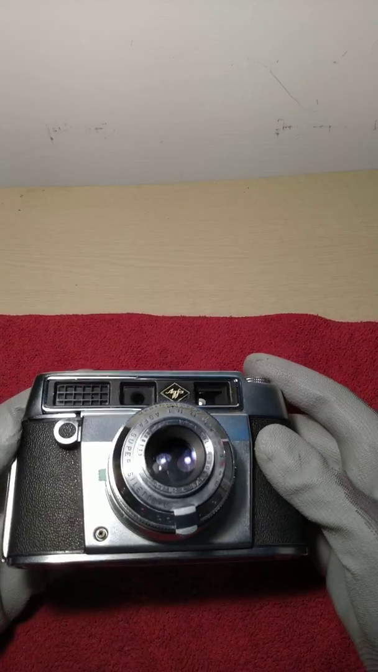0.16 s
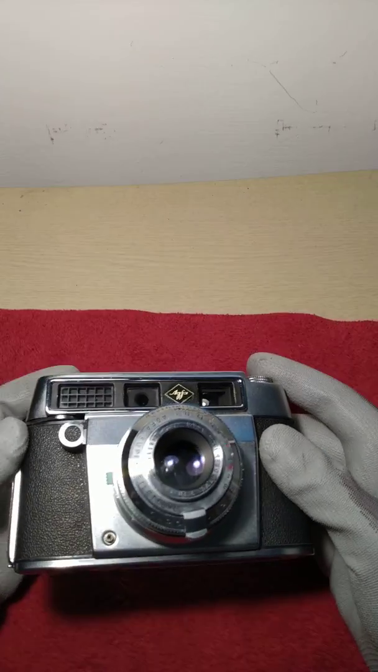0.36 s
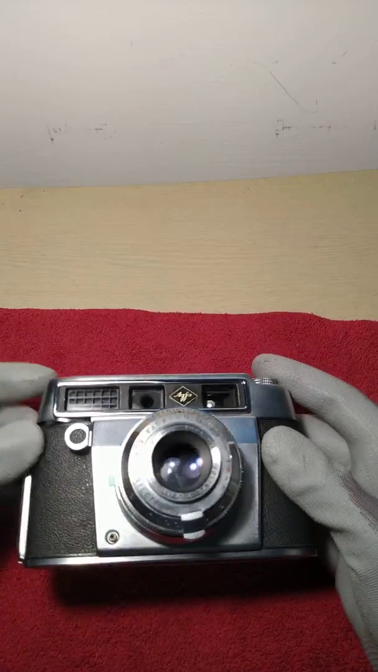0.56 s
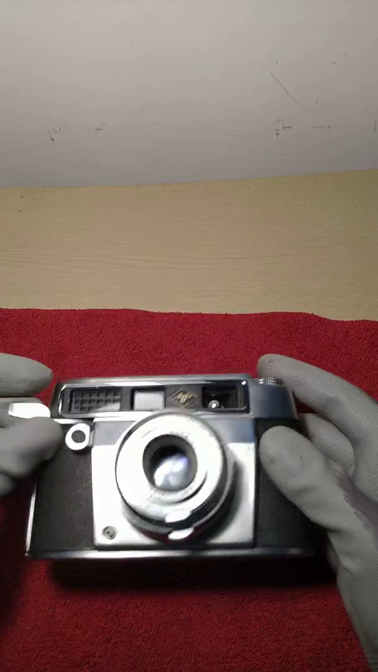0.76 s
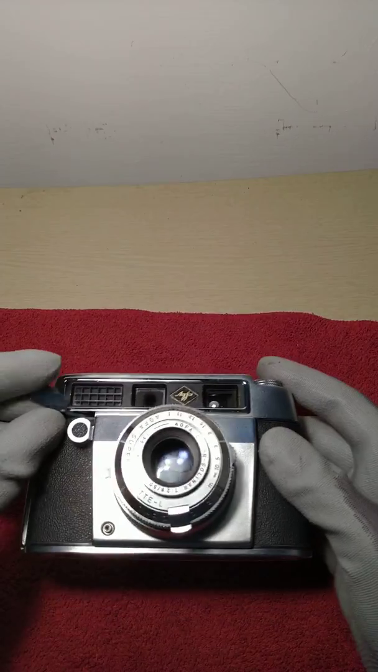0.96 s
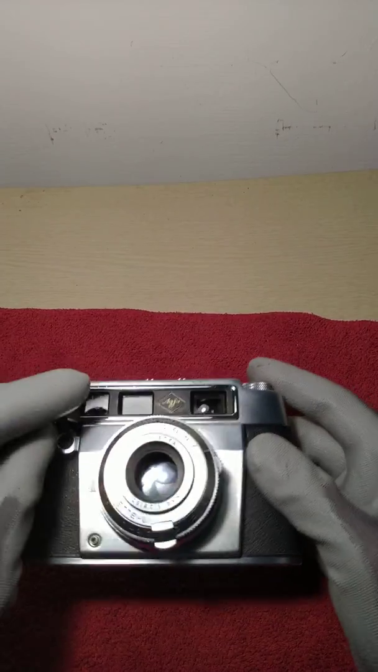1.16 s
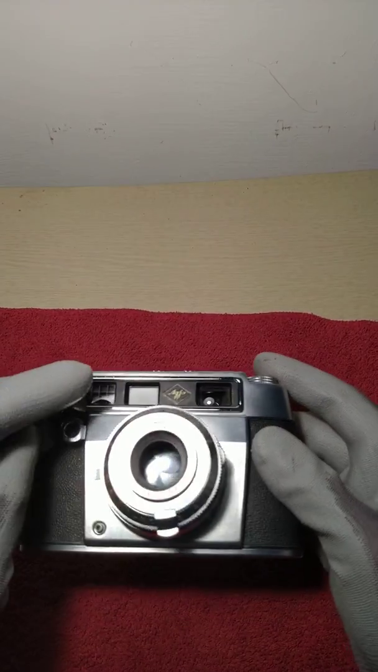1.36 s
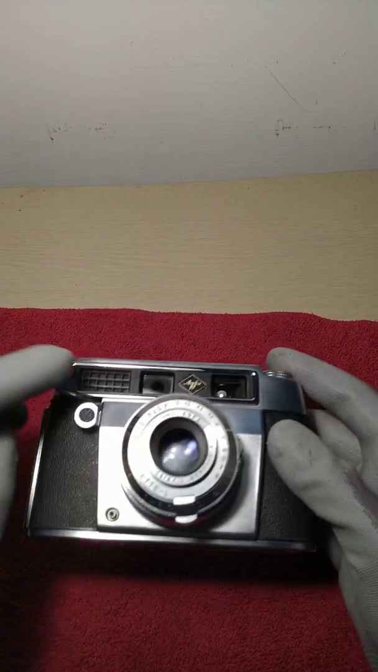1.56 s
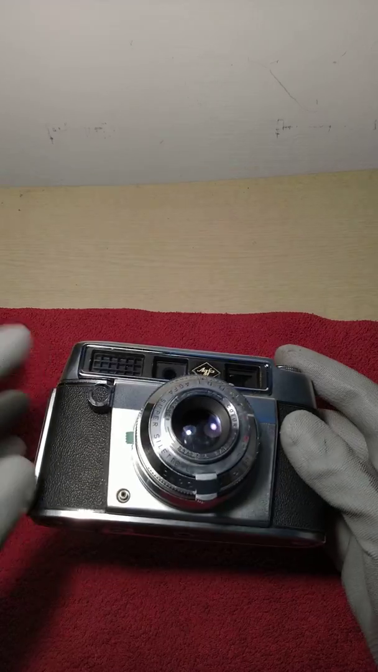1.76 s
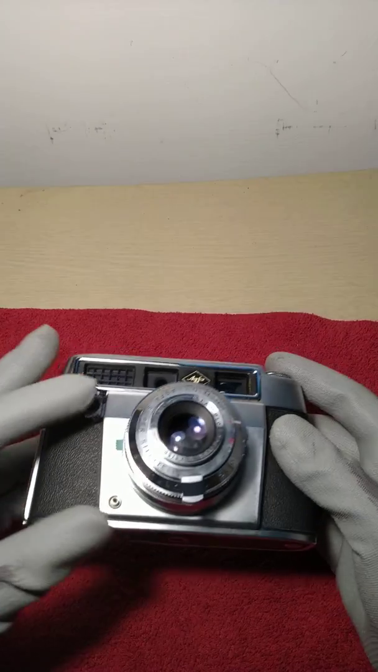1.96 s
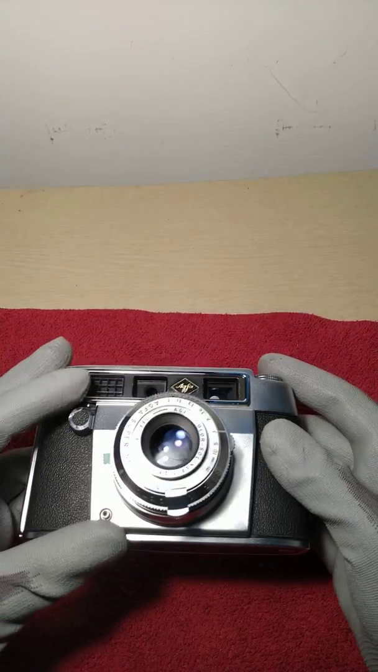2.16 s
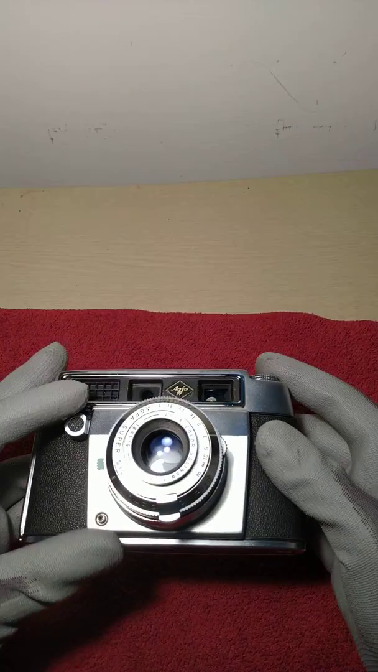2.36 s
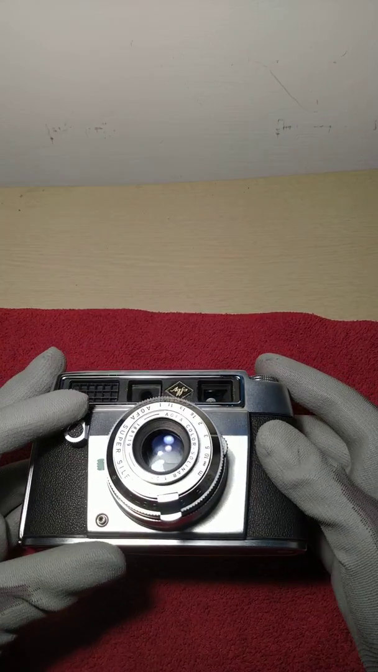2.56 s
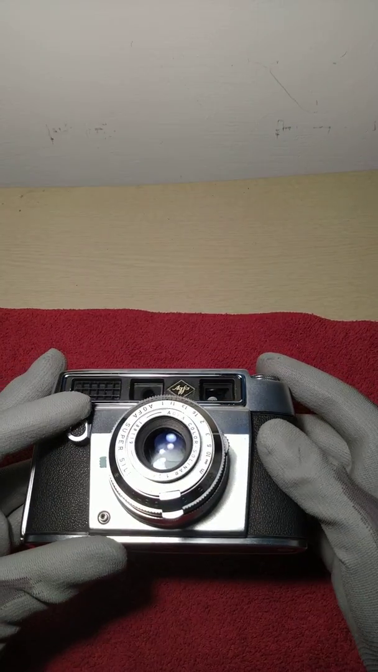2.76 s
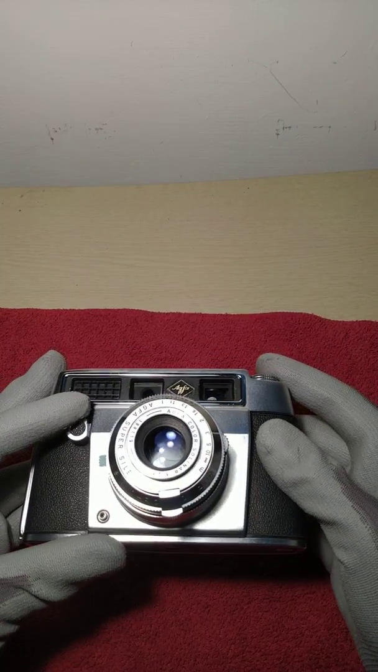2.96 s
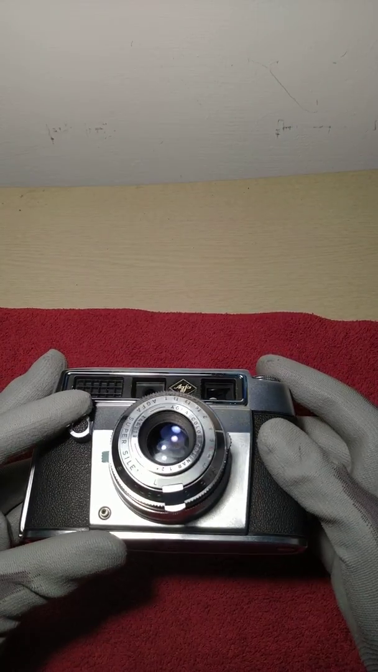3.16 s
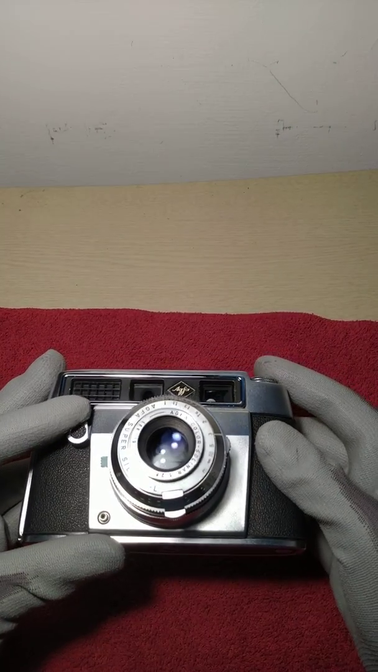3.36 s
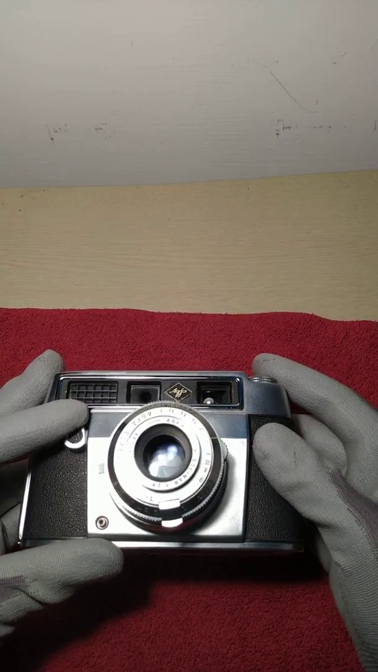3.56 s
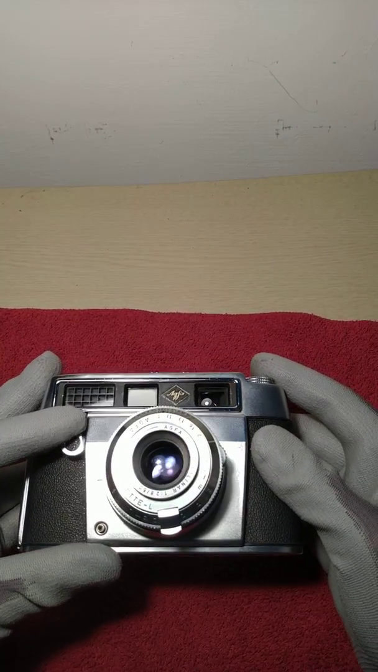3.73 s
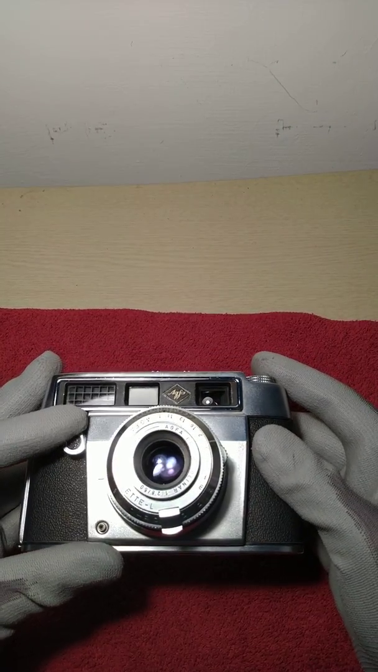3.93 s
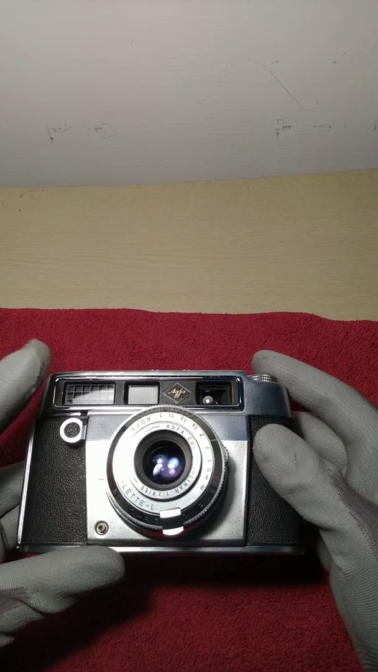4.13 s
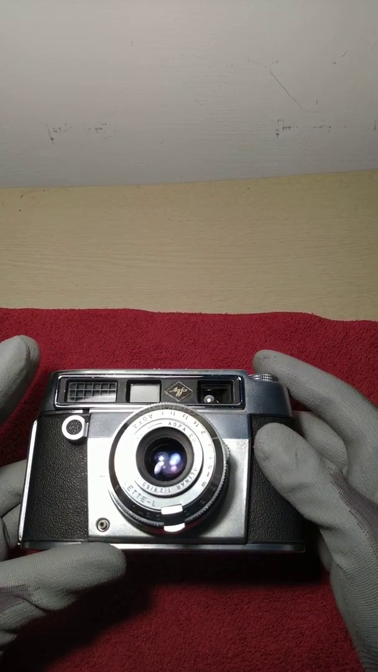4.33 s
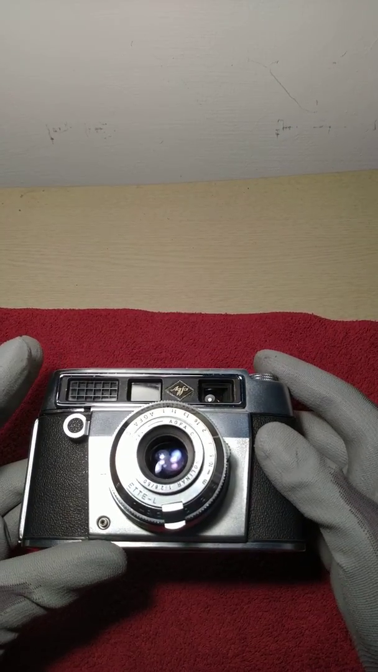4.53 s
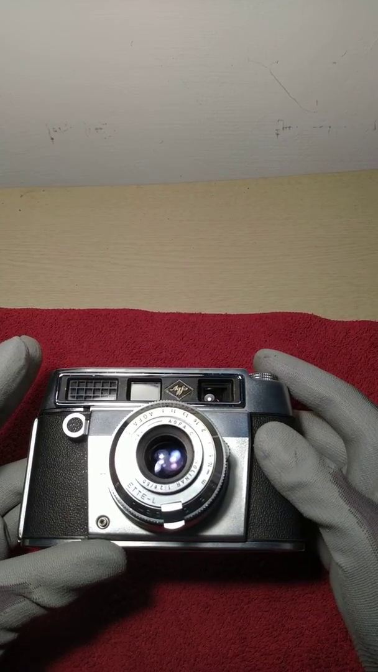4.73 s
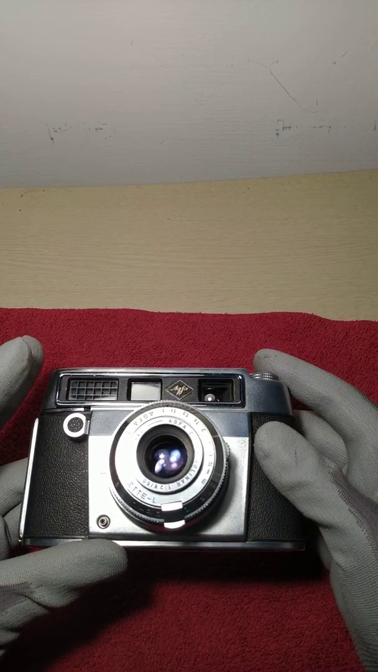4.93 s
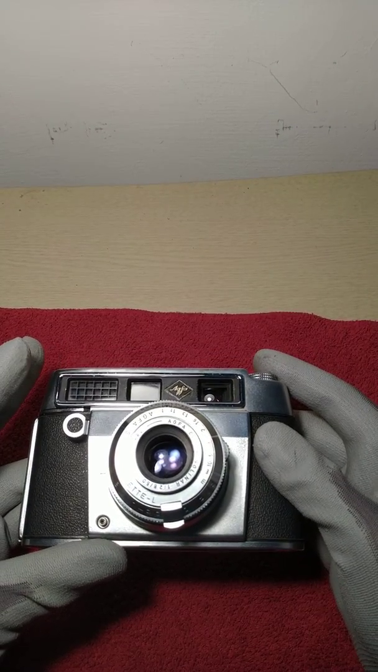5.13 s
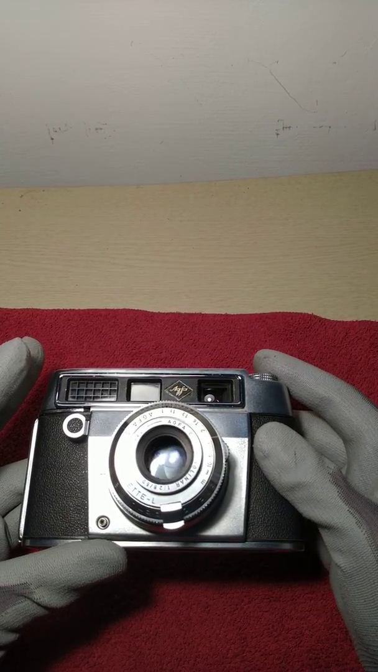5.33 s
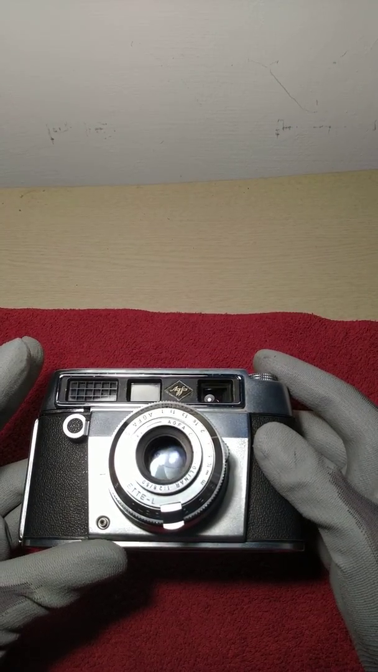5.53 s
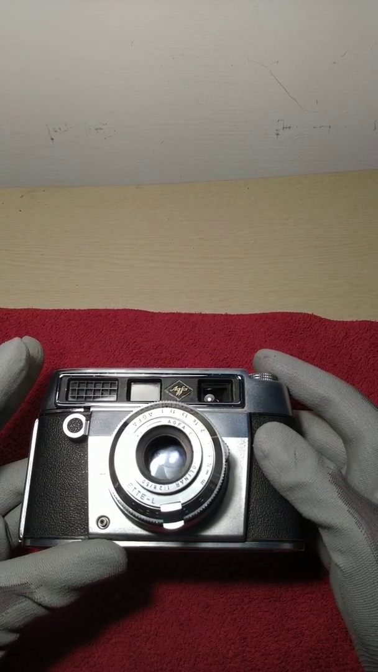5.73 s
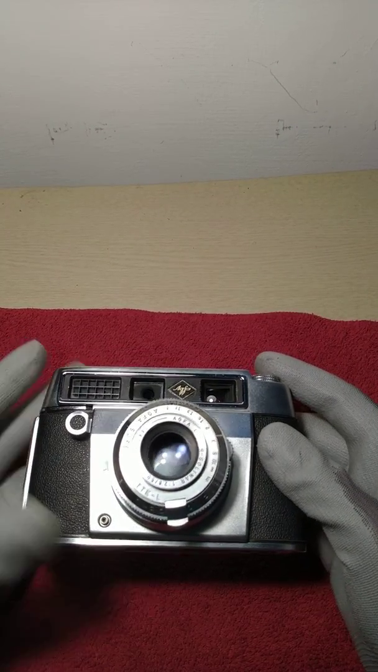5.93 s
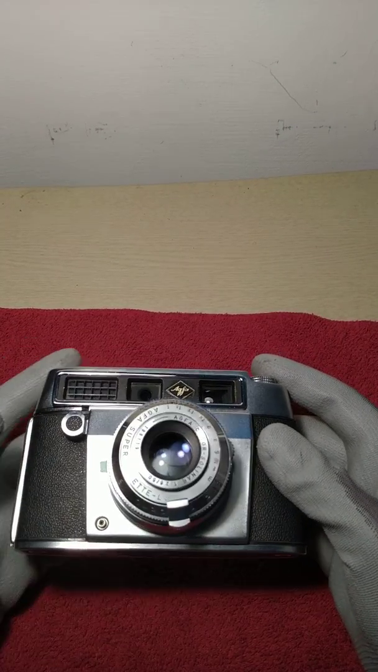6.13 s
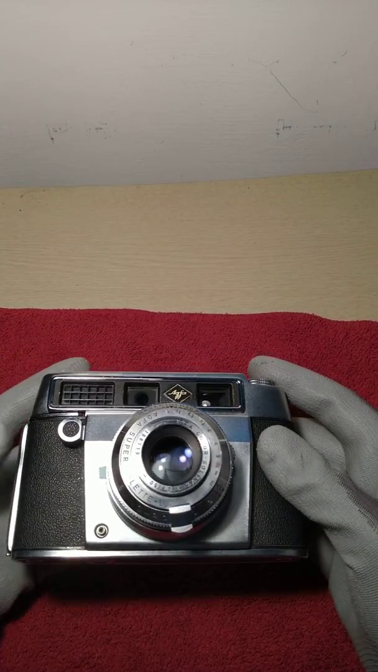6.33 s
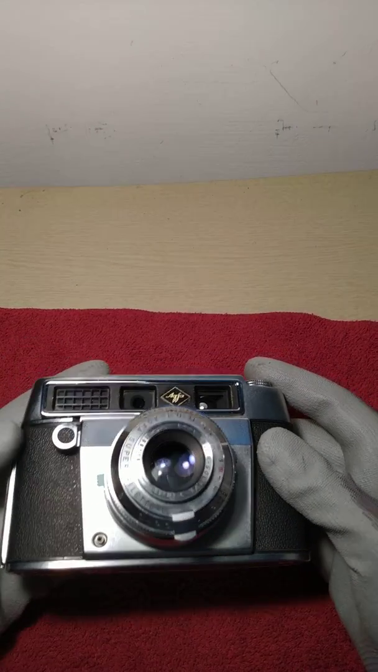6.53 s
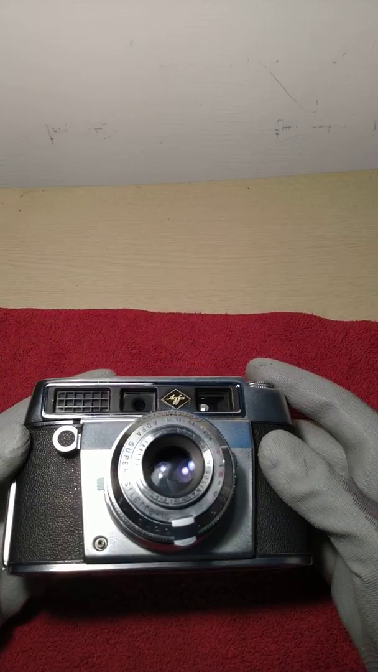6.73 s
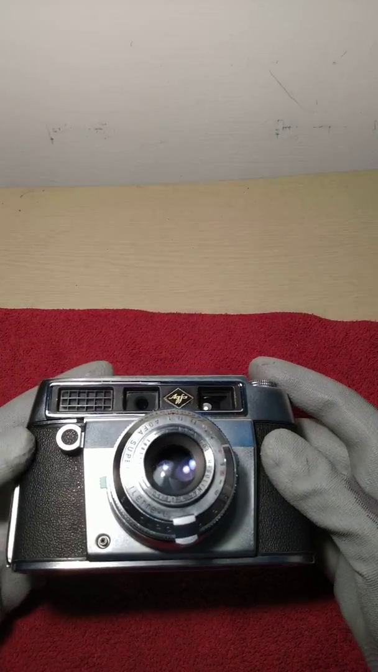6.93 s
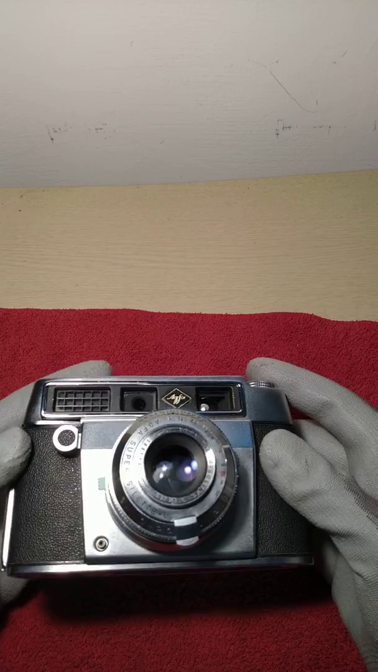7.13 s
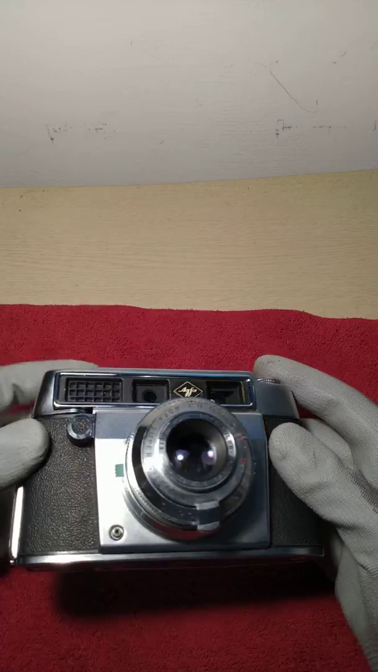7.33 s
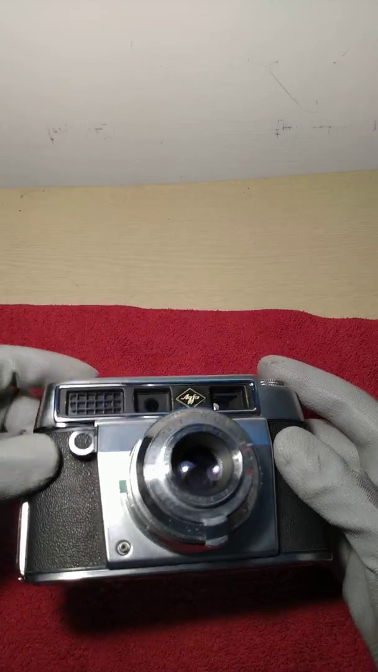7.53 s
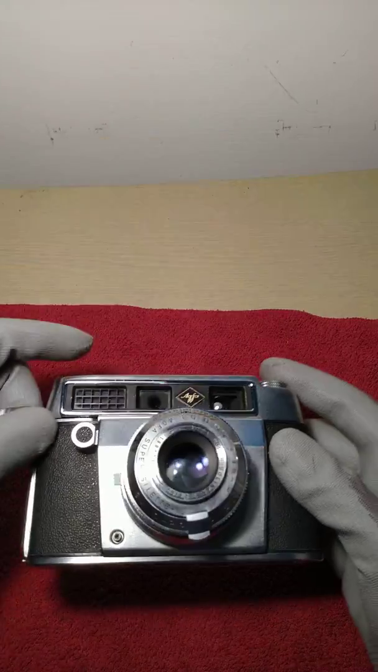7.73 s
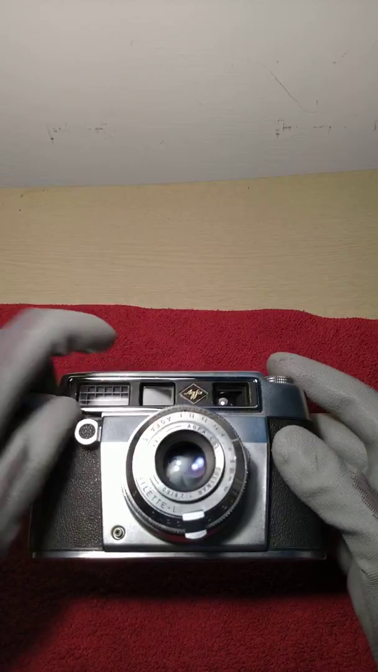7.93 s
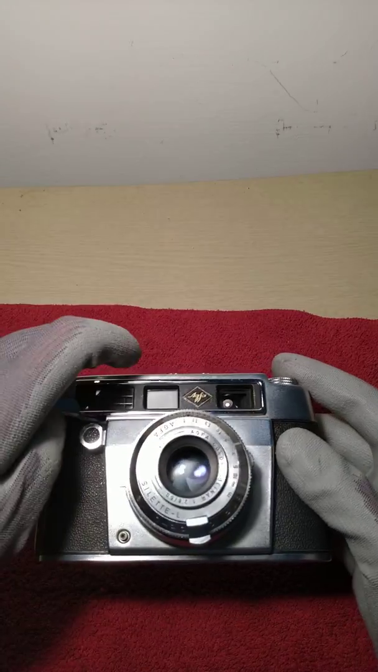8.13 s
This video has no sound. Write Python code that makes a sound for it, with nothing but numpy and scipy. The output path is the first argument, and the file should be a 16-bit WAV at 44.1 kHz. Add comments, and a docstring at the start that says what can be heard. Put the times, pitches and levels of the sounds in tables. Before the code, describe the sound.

Gloved hands ratchet and snap a vintage camera's lever, trip its shutter into a buzzing clockwork whirr, then wind again over low room hum.

```python
"""A small quiet room, two microphones 16 cm apart, an old leaf-shutter camera on a cloth-covered table.
Throughout, mains hum and ventilation: slowly swelling sines and shaped noise. First gloved hands wind: a
pawl clicks over a ratchet, gears drag, and the lever snaps home with a thump of the table. Then the release
trips the shutter, its clockwork escapement whirrs through a long exposure and stops; the winding resumes.
Each contact is a burst of tiny taps that rings the modes of the body and its small steel parts."""
import sys
import numpy as np
from scipy import signal
from scipy.fft import rfft, irfft, next_fast_len
from scipy.io import wavfile

SR = 44100
rng = np.random.default_rng(int(sys.argv[2]) if len(sys.argv) > 2 else 0)


def log_audio(samples):
    """Write samples as a 16-bit WAV file to the path given in sys.argv[1]."""
    # one column per channel
    frames = np.atleast_2d(samples).T
    # limit to full scale, then quantise
    limited = np.clip(frames, -1, 1)
    pcm = np.round(limited * 32767).astype(np.int16)
    wavfile.write(sys.argv[1], SR, pcm)


def boost(x):
    """Linear amplitude factor 10**(x/20) for a level x in decibels (scalar or array-like)."""
    u = np.asarray(x, float) / 20
    return 10 ** u


N = 365588
PADDED = next_fast_len(N)
SECONDS = np.arange(N) / SR


def rms_one(x):
    """Scales to rms 1."""
    return x / np.sqrt(np.mean(x ** 2) + 1e-20)


def energy_one(x):
    """Scales each channel to energy 1."""
    return x / np.sqrt(np.sum(x ** 2, -1, keepdims=True))


def in_time(rows):
    """Reads each column of a curve at every sample; the first column is the time."""
    s, *columns = np.transpose(rows)
    return [np.interp(SECONDS, s, column) for column in columns]


def while_on(rows, fade_s=0.0065):
    """Is 1 between the first and last row, with short fades outside."""
    start, end = rows[0][0], rows[-1][0]
    return np.interp(SECONDS, [start - fade_s, start, end, end + fade_s], [0, 1, 1, 0])


def at_hz(points, hz):
    """Reads a spectrum on a log-frequency axis."""
    point_hz, db = np.transpose(points)
    return np.interp(np.log(hz), np.log(point_hz), db)


def drift(rate_hz):
    """Wanders by chance: normal values, rate_hz of them a second, joined by straight lines."""
    return np.interp(SECONDS * rate_hz, np.arange(1000), rng.standard_normal(1000))


# How much louder ventilation and hiss are on the left. Each row: frequency in Hz, left over right in dB.
LEFT_OVER_RIGHT = [(60, 2.5), (110, -2), (200, 5), (380, 2.5), (700, 1), (1290, -1.5), (2380, -1),
                   (4400, -2.5), (8120, -0.5), (15000, 2.5)]


def diffuse(spectrum):
    """Noise arriving from all sides: two spaced microphones agree only at long wavelengths."""
    gap_m, sound_m_per_s = 0.16, 343
    hz = np.maximum(np.fft.rfftfreq(PADDED, 1 / SR), 1)
    mid, side = rfft(rng.standard_normal((2, PADDED)))
    alike = np.sinc(2 * hz * gap_m / sound_m_per_s)
    inside = (hz > spectrum[0][0]) & (hz < spectrum[-1][0])
    gain = inside * boost(at_hz(spectrum, hz) + at_hz(LEFT_OVER_RIGHT, hz) * [[0.5], [-0.5]])
    gain /= np.sqrt(2 * np.mean((gain * (hz > 150)) ** 2))     # rms 1 counted above 150 Hz
    pair = np.sqrt(1 + alike) * mid + np.sqrt(np.abs(1 - alike)) * side * [[1], [-1]]
    return hz, gain * pair


# Ventilation in the room. Each row: frequency in Hz, relative density in dB per Hz.
VENTILATION = [(15, -45), (25, -3), (54, -9), (119, -3), (216, -12), (285, -3.5), (344, -8.5), (401, 0.5),
               (468, -6.5), (519, -11), (756, -10.5), (852, -6), (961, -12.5), (1100, -7.5), (1500, -16.5),
               (1950, -32), (3300, -120)]
# Swell of the ventilation's drone. Each row: time in seconds, level in dB.
DRONE_SWELL = [(0, -2.5), (1.5, -2.5), (3.3, 2), (5.6, 2), (7.3, -2), (8.29, -2.5)]


def ventilation():
    """Broad air noise, whose drone around 350 Hz swells and wanders."""
    hz, air = diffuse(VENTILATION)
    drone = np.exp(-(np.log(hz / 350) / 0.74) ** 2)
    steady = irfft(air * (1 - drone), PADDED)[:, :N]
    swelling = irfft(air * drone, PADDED)[:, :N]
    swell_db = in_time(DRONE_SWELL)[0] + drift(4.6)
    return boost(-47) * (steady + swelling * boost(swell_db))


# Hiss over the ventilation. Each row: frequency in Hz, relative density in dB per Hz.
HISS_SPECTRUM = [(760, -24), (1300, -6), (1460, 0), (1590, -2), (1930, 0.5), (2330, -2), (4510, -8),
                 (6610, -18.5), (8090, -28), (10600, -12.5), (12800, -13.5), (15800, -26), (16500, -56)]


def hiss():
    """Steady shaped noise, diffuse at the two microphones."""
    return boost(-50.5) * irfft(diffuse(HISS_SPECTRUM)[1], PADDED)[:, :N]


# Mains frequency and its octave, in Hz.
MAINS_HZ = [60, 120]
# Slow swell of the hum. Each row: time in seconds, rms level of the mains tone in dB, of its octave in dB.
HUM_SWELL = [(0, -51.5, -57), (1.6, -54, -57), (2.9, -55, -53.5), (4.1, -49.5, -55), (5.5, -49.5, -55.5),
             (8.29, -50, -57)]


def mains_hum():
    """Mains tone and octave, wavering in level and phase, slightly out of phase between microphones."""
    hum = np.zeros((2, N))
    for hz, db in zip(MAINS_HZ, in_time(HUM_SWELL)):
        level = np.sqrt(2) * boost(db + 0.8 * drift(2.51) + 0.84 * drift(4.6))
        phase = 0.14 * drift(4.8) + np.array([[0.08], [-0.08]])
        hum += level * np.sin(2 * np.pi * hz * SECONDS + phase)
    return hum


def room(x):
    """Diffuse tail: dying noise, its own at each microphone, starting after the first wall."""
    t60_s, level_db, dullness, first_wall_s = 0.27, -16, 0.1, 0.004
    t = np.arange(SR // 2) / SR
    noise = signal.lfilter([1], [1, -dullness], rng.standard_normal((2, len(t))))
    tail = noise * boost(-60 * t / t60_s) * (t > first_wall_s)
    tail /= np.sqrt(np.sum(tail ** 2) / 2)
    return boost(level_db) * signal.fftconvolve(x, tail, axes=1)[:, :N]


# The lever's blow to the table: start in seconds, level in dB.
TABLE_BLOW = (1.786, -22)
# Modes of the table top. Each row: frequency in Hz, relative level in dB, time to fall 60 dB in seconds.
TABLE_MODES = [(61, -4, 0.077), (79, 0, 0.067), (134, -5, 0.059), (240, -3.5, 0.033), (420, 6.5, 0.0085),
               (643, -0.5, 0.025), (877, -6, 0.013), (1280, -2, 0.022)]


def thump():
    """Modes of the table top ring down after the lever snaps back, alike at both microphones."""
    start_s, blow_db = TABLE_BLOW
    t, i = np.arange(SR // 2) / SR, round(start_s * SR)
    out = np.zeros(N)
    for hz, db, t60_s in TABLE_MODES:
        out[i:i + len(t)] += boost(blow_db + db - 60 * t / t60_s) * np.sin(2 * np.pi * hz * t)
    return out


def ringing(modes, scatter_db, tilt_db=0, near_hz=3000, near_db=0):
    """Response to one tap: decaying modes, neighbours in opposite sign, fresh strengths per microphone."""
    hz, width, db = np.transpose(modes)[:, :, None]
    t = np.arange(700) / SR
    luck = rng.standard_normal((2, len(modes), 1))
    tilted = db + tilt_db * np.log2(hz / 3000)     # dB per octave
    near = near_db * np.exp(-(np.log2(hz / near_hz) / 0.21) ** 2)     # modes close to the blow ring more
    sign = (-1) ** np.arange(len(modes))[:, None]
    gain = sign * boost(tilted + near + scatter_db * luck)
    decay = np.sqrt(width) * np.exp(-np.pi * width * t)
    return energy_one(np.sum(gain * decay * np.sin(2 * np.pi * hz * t), 1))


def micro_contacts(size, spread_db, shared):
    """Uneven tiny taps, partly shared: each microphone hears them off another face of the body."""
    common, *own = rng.standard_normal((3, size))
    sizes = boost(spread_db * np.minimum(rng.exponential(1, size), 5))
    return rms_one((shared * common + (1 - shared) * np.array(own)) * sizes)


def strike(taps, response):
    """Every tap sets the response ringing."""
    return signal.fftconvolve(taps, response, axes=1)


# Modes of the camera body. Each row: frequency in Hz, width in Hz, relative level in dB.
BODY_MODES = [(1200, 490, -18.5), (1780, 135, -4.5), (2290, 1450, 1), (2780, 100, -15.5), (3300, 2100, -13),
              (4070, 560, 1.5), (4820, 380, -0.5), (5630, 1080, 0.5), (6360, 410, -2.5), (6770, 970, -9)]
# Modes of its small steel parts. Each row: frequency in Hz, width in Hz, relative level in dB.
STEEL_MODES = [(9190, 620, -8), (10180, 1150, -1.5), (11300, 680, 2.5), (12300, 720, 1.5),
               (13360, 1100, -4.5), (13600, 700, -21), (14150, 990, -5.5), (15500, 510, -0.5),
               (15820, 600, -4.5)]


def clicks(events):
    """Each contact chatters for a few ms and rings steel parts and body."""
    out, t = np.zeros((2, N + SR)), np.arange(1200) / SR
    for s, db, body_db, chatter_ms, tilt_db, near_hz in events:
        force = np.exp(-1000 * t / chatter_ms) + 2.7 * np.exp(-t / 0.000086)     # the first touch is hardest
        taps = micro_contacts(len(t), 1.6, 0.38) * force
        steel = energy_one(strike(taps, ringing(STEEL_MODES, 1.04)))
        steel *= boost([[1.2], [-1.2]])     # left, right
        body = energy_one(strike(taps, ringing(BODY_MODES, 2.5, tilt_db, near_hz, near_db=8)))
        i = round(s * SR)
        # a longer chatter carries more energy
        out[:, i:i + steel.shape[1]] += (steel + boost(body_db) * body) * np.sqrt(chatter_ms) * boost(db)
    return out[:, :N]


# A gloved finger lands on the body. Each row: start in seconds, strength in dB.
FINGER_TOUCHES = [(2.025, -26), (6.938, -30), (7.174, -33), (7.209, -24.5), (7.853, -33)]


def touches():
    """Soft contacts that ring mostly the body."""
    body_db, chatter_ms, tilt_db, mode_hz = 7, 2.2, -0.5, 3300
    return clicks([(s, db, body_db, chatter_ms, tilt_db, mode_hz) for s, db in FINGER_TOUCHES])


# Gears drag under the lever, swelling and letting go. Each row: crest in seconds, treble level in dB,
# seconds to build by 18 dB, seconds to fade by 18 dB.
GEAR_DRAG = [(0.52, -41, 0.1, 0.035), (0.588, -39, 0.064, .025), (0.615, -36, .03, 0.013),
             (0.655, -49, 0.037, 0.045), (1.45, -55, 0.23, .19), (7.419, -38.5, 0.07, 0.092),
             (7.59, -34.5, 0.031, 0.0093), (7.635, -38, 0.034, 0.021)]


def drag():
    """Gear teeth rub, and loose parts rattle after the snap: dense contacts into the same parts."""
    rub = np.zeros(N)
    for s, db, build_s, fade_s in GEAR_DRAG:
        away = np.maximum((s - SECONDS) / build_s, (SECONDS - s) / fade_s)
        rub += boost(db - 18 * away)
    rattle_s, rattle_db, loss_db_per_s = 1.787, -27, 191
    after = SECONDS - rattle_s
    rattle = boost(rattle_db - loss_db_per_s * np.abs(after)) * (after > 0)
    taps = micro_contacts(N, 4.5, 0.45) * boost(2.5 * drift(110))
    steel = strike(taps * (rub + rattle), ringing(STEEL_MODES, 0))
    rubbed_body = strike(taps * rub * boost(-4), ringing(BODY_MODES, 0))
    rattled_body = strike(taps * rattle * boost(0.4), ringing(BODY_MODES, 0, tilt_db=-0.5))
    return (steel + rubbed_body + rattled_body)[:, :N]


# Run of the escapement. Each row: time in seconds, ticks per second before jitter, level in dB.
ESCAPEMENT_RUN = [(3.69, 140, -52), (3.9, 130, -49.5), (4.35, 147, -47.5), (4.72, 130, -50),
                  (4.9, 102, -52), (5.36, 82, -50)]
# Modes of its pallet. Each row: frequency in Hz, width in Hz, relative level in dB.
PALLET_MODES = [(3970, 470, -8), (6080, 850, -12), (9070, 540, -8), (11500, 500, -2.5), (12300, 730, 1),
                (13000, 680, 1), (14200, 740, -4), (15400, 750, -4.5)]


def escapement():
    """The pallet rocks, tick and weaker tock, unsteadily, then slowing as the spring runs down."""
    tock_db, tick_ms, jitter = -3, 1.6, 0.1
    per_s, db = in_time(ESCAPEMENT_RUN)
    turns = np.cumsum(per_s * (1 + jitter * drift(35))) / SR
    n = turns.astype(int)
    strength = boost(tock_db * (n % 2) + 1.6 * rng.standard_normal(3000)[n])
    since_tick_ms = 1000 * (turns - n) / per_s
    force = np.exp(-since_tick_ms / tick_ms) + 0.17     # a little rubbing between ticks
    taps = rms_one(micro_contacts(N, 2, 0.45) * strength * force)
    return strike(taps * boost(db) * while_on(ESCAPEMENT_RUN), ringing(PALLET_MODES, 0))[:, :N]


# The pawl drops off a ratchet tooth. Each row: start in seconds, strength in dB, body over treble in dB.
PAWL_DROPS = [(0.3076, -6, -12), (0.3484, -6.5, -14.5), (0.376, -7, -16), (0.448, -9, -19),
              (0.49, -16.5, -2), (0.5032, -14.5, -10), (0.5236, -8, -15), (0.5903, -8, -13),
              (0.617, -7.5, -11.5), (0.6374, -10, -19), (0.655, -7, -16), (0.752, -7, -13),
              (0.7882, -4.5, -12), (0.813, -6.5, -12.5), (0.8418, -5, -15), (1.019, -7.5, -13.5),
              (7.199, -5.5, -17), (7.2363, -8, -12), (7.2708, -9, -14.5), (7.332, -9.5, -19),
              (7.418, -18, -19), (7.4283, -9, -23), (7.544, -8.5, -18), (7.5904, -3.5, -14),
              (7.612, -9, -15), (7.626, -6.5, -13), (7.6392, -8, -10), (7.663, -6.5, -17),
              (7.8867, -6, -14.5), (7.9809, -5, -13.5)]


def pawl():
    """Every tooth rings the same parts, strongest near the ratchet's body mode."""
    chatter_ms, tilt_db, mode_hz = 1.8, 2, 5730
    return clicks([(s, db, body_db, chatter_ms, tilt_db, mode_hz) for s, db, body_db in PAWL_DROPS])


# Lever, release and shutter blades meet their stops. Each row: start in seconds, strength in dB,
# body over treble in dB, chatter in ms, body mode nearest the blow in Hz.
STOP_BLOWS = [(1.1607, -1.5, -15.5, 2.7, 4000), (1.167, -7, -9, 1.8, 3970), (1.181, -5, -4, 3.5, 3300),
              (1.1906, -6, 0.5, 3.8, 2300), (1.7687, 0, -12.5, 1.8, 4000), (1.7852, 10.5, -1.5, 1.07, 2940),
              (1.789, 5, -5.5, 1.7, 1200), (1.802, -9.5, 4.5, 2.1, 4820), (1.815, -12.5, 0, 2.7, 4960),
              (3.372, 4, -10, 1.3, 5200), (3.375, -7, -5, 3.5, 1780), (3.673, -15, 3, 3.2, 4070),
              (3.6763, -4, 3.5, 3.8, 4070), (3.6836, 4.5, -5.5, 1.8, 4270), (3.6815, -6, -6, 4.2, 4300),
              (3.688, -6.5, -6, 8.3, 4800), (4.044, -12, -6, 5.1, 2400), (4.0563, 5, -4, 2.1, 1200),
              (4.0582, -3, 2.5, 0.89, 2900), (5.3662, -8.5, 0.5, 1.7, 4400), (5.37, -8, 2.5, 1.16, 4530),
              (5.3726, -5.5, -4, 2.8, 1780), (8.1222, -8.5, 1, 1.8, 1250), (8.126, -14.5, 0.5, 2.4, 1200)]


def stops():
    """The body's colour follows the place of the blow: near higher modes it rings brighter."""
    events = []
    for s, db, body_db, chatter_ms, hz in STOP_BLOWS:
        tilt_db = 0.7 + 3.5 * np.log2(hz / 3000)
        events.append((s, db, body_db, chatter_ms, tilt_db, hz))
    return clicks(events)


def port_notch(x):
    """The microphone port weakens a band of the camera's close sound."""
    notch_hz, width_hz, notch_db = 8260, 2500, -3
    b, a = signal.iirpeak(notch_hz, notch_hz / width_hz, SR)
    return x - (1 - boost(notch_db)) * signal.lfilter(b, a, x)


def scene():
    """Camera with its deep sound cut away and through the port, plus room, table and background."""
    background = ventilation() + hiss() + mains_hum()
    camera = drag() + escapement() + pawl()
    camera[1] = np.roll(camera[1], round(0.0003 * SR))     # seconds later: these sit nearer the left microphone
    camera += touches() + stops()
    bass_cut = signal.butter(4, 750, "high", fs=SR, output="sos")
    camera = port_notch(signal.sosfilt(bass_cut, camera))
    return background + room(camera) + thump() + camera


def low_pass(x):
    """Removes everything above the highest recorded frequency."""
    return signal.sosfilt(signal.butter(12, 16970, fs=SR, output="sos"), x)


def record(dry):
    """Deep bass is cut, the highest peaks are rounded and the top is cut."""
    x = signal.sosfilt(signal.butter(5, 40, "high", fs=SR, output="sos"), dry)
    x = 0.9 * np.tanh(x / 0.9)
    x = signal.sosfilt(signal.cheby2(10, 50, 16700, fs=SR, output="sos"), x)     # 50 dB down from 16700 Hz
    return low_pass(x)


dry = scene()
out = record(dry)
log_audio(out)
```